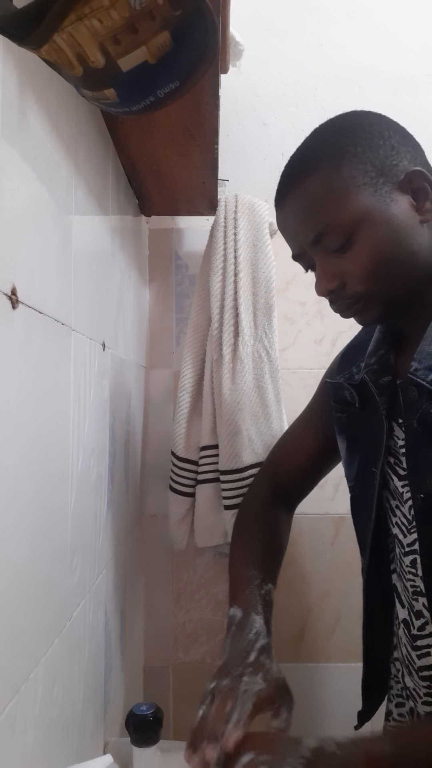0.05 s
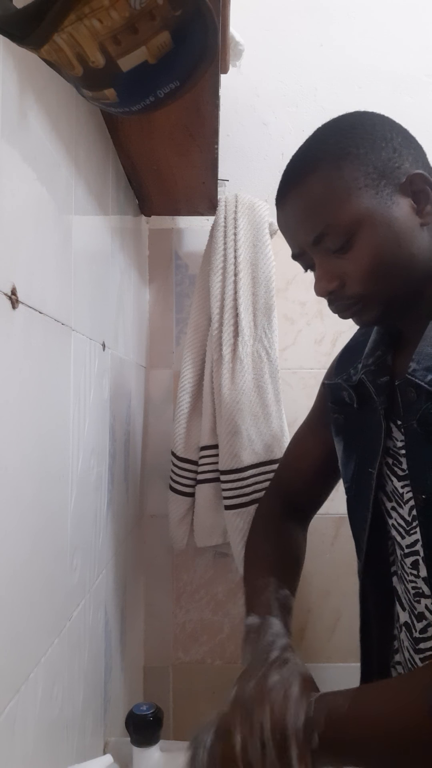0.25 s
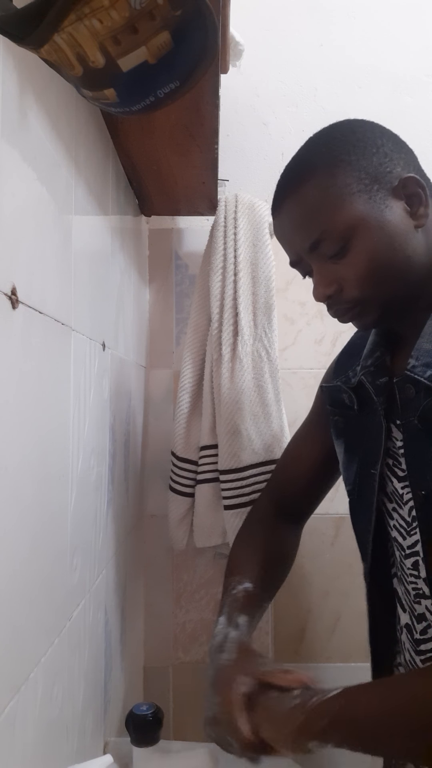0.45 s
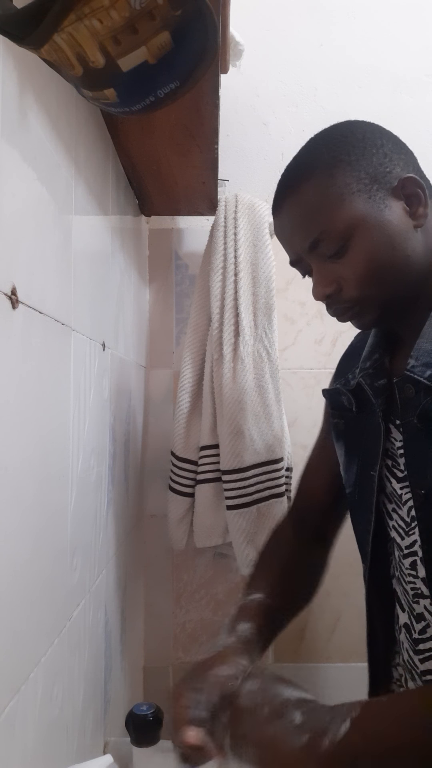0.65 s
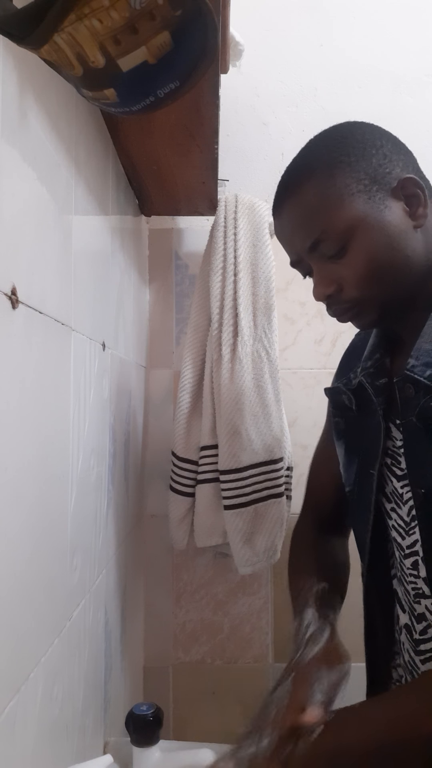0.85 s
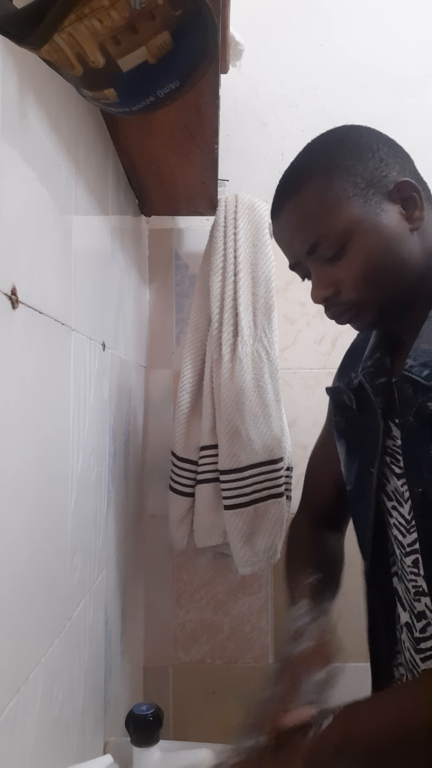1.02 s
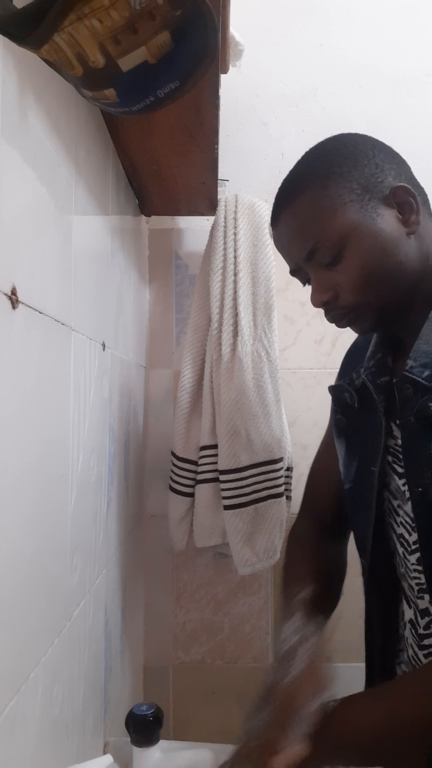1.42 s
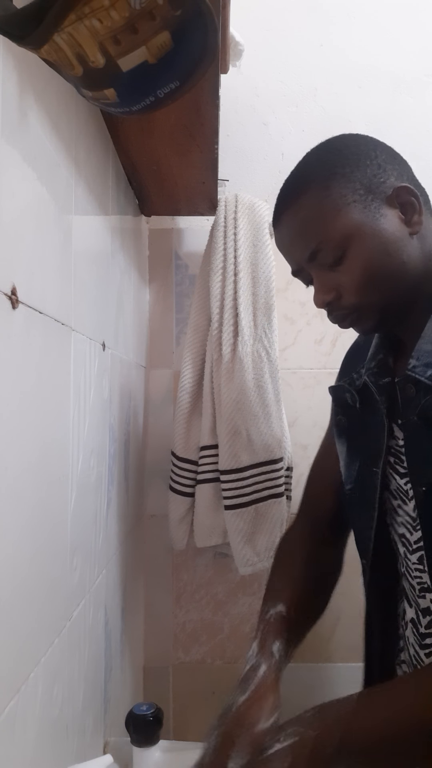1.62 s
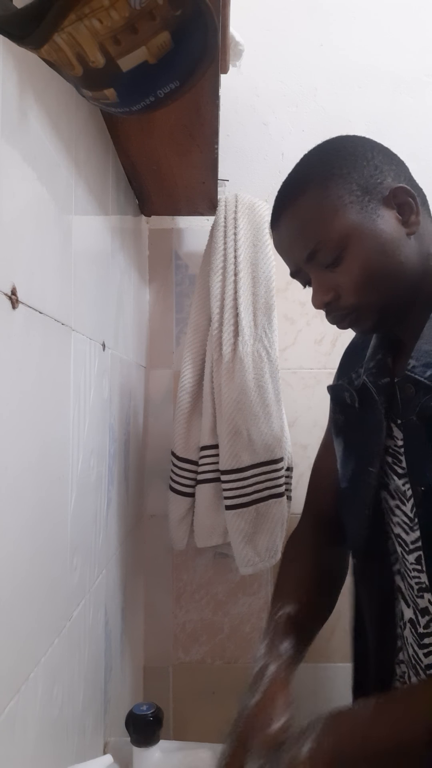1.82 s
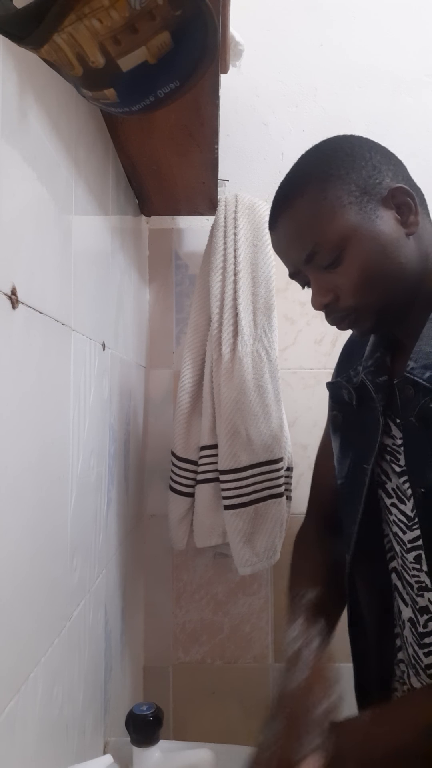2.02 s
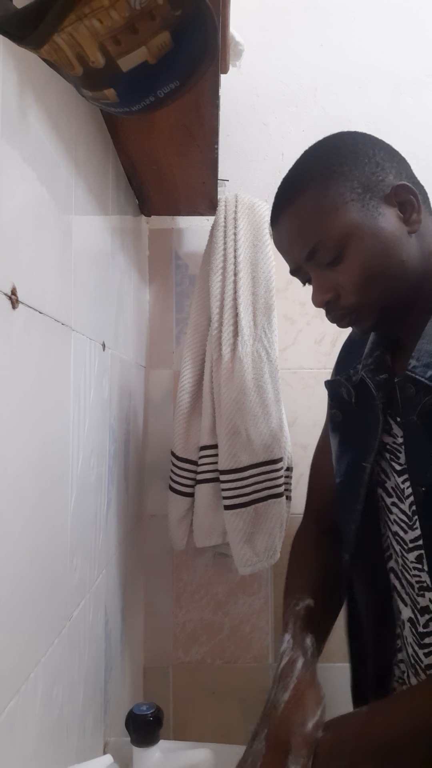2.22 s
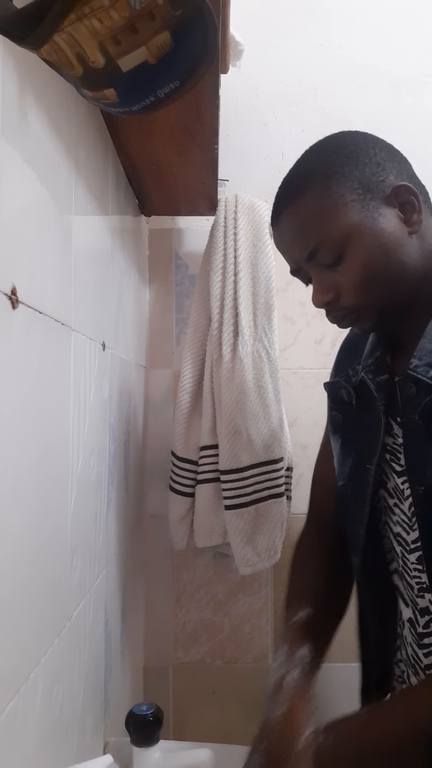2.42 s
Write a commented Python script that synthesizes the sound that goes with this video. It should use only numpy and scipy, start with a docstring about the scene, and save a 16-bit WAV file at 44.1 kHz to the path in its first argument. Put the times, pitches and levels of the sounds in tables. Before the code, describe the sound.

Soapy wet hands rub together in a small tiled bathroom. A sharp, wet squelch comes at about 0.2 seconds, followed by a few softer ones. From 0.7 seconds the hands rub quickly, about eight strokes a second, the lather fizzing and sloshing. Brighter squelches stand out around 2.2 and 2.4 seconds. The tiles add a short ring, and a faint low room rumble lies underneath.

```python
"""A small tiled bathroom: soapy wet hands rub together, about eight strokes a second.
Each stroke shears the lather into a fizz of tiny bursting bubbles; wetter strokes also slosh.
Air trapped between the palms squelches out. The tiles ring with it all,
and the room's lowest resonances boom faintly underneath."""
import sys
import numpy as np
from scipy import signal
from scipy.fft import rfft, irfft, next_fast_len
from scipy.io import wavfile
from scipy.ndimage import map_coordinates

SR = 44100
rng = np.random.default_rng(int(sys.argv[2]) if len(sys.argv) > 2 else 0)


def waveform_to_disk(signal):
    """Save audio, clipped to [-1, 1], as 16-bit WAV at the path in sys.argv[1]."""
    frames = np.transpose(np.atleast_2d(signal))
    scaled = np.clip(frames, -1, 1) * 32767
    samples = np.round(scaled).astype(np.int16)
    wavfile.write(sys.argv[1], SR, samples)


N = 112454


def amp(db):
    """dB to gain."""
    return 10 ** (np.asarray(db) / 20)


def unit(x):
    """Scale to rms 1."""
    return x / np.sqrt(np.mean(x ** 2) + 1e-20)


def along(points, hz):
    """Interpolate (Hz, value) points on a log frequency axis."""
    points_hz, values = np.transpose(points)
    return np.interp(np.log(hz + 1), np.log(points_hz + 1), values)


def curve(rows):
    """Interpolate (s, value) rows to one value per sample."""
    return np.interp(np.arange(N) / SR, *np.transpose(rows))


def wobble(knots_per_s):
    """Smooth random curve."""
    return map_coordinates(rng.standard_normal(2048), [np.arange(N) * knots_per_s / SR], mode="wrap")


def filtered(x, response):
    """Filter x by response(hz)."""
    size = next_fast_len(N + 8192)
    return irfft(rfft(x, size) * response(np.fft.rfftfreq(size, 1 / SR)), size)[..., :N]


def coloured(x, spectrum):
    """Shape x by (Hz, dB) points; rms 1."""
    return unit(filtered(x, lambda hz: amp(along(spectrum, hz))))


def pan(right_db):
    """Stereo gains: left down, right up by right_db."""
    return amp(np.array([[-right_db], [right_db]]))


def bubbles(per_s, size=N, spread_db=2.5, skin_db=-9.5):
    """Tiny bursts of uneven size over the smooth hiss of sliding skin."""
    strengths = amp(spread_db * np.minimum(rng.exponential(size=size), 4)) * rng.choice([-1, 1], size)
    bursts = unit(strengths * (rng.random(size) < per_s / SR))
    return unit(bursts + amp(skin_db) * rng.standard_normal(size))


def rubbing(clump_db=1.76):
    """Each stroke speeds up and slows down; lather fizzes and sparkles, wetter strokes also slosh."""
    # Each row: start, rise and fall in seconds, fizz in dB, slosh in dB, sparkle in dB re fizz.
    strokes = [(-.035, 0.033, 0.026, -70, -69, -22), (0.688, 0.085, 0.081, -56.5, -62.5, -12.5),
               (.785, 0.046, .045, -61, -95, -6), (.905, 0.042, 0.032, -52.5, -67, -9),
               (1.006, 0.036, 0.042, -54.5, -58, -9), (1.114, 0.045, 0.04, -56, -60.5, -9),
               (1.219, 0.03, 0.042, -57.5, -54, -10.5), (1.321, 0.046, 0.034, -61, -62, -5.5),
               (1.437, 0.029, 0.03, -55.5, -58, -8), (1.549, 0.023, 0.052, -57, -67.5, -6.5),
               (1.584, 0.046, 0.077, -64, -67, -7), (1.669, 0.036, .05, -58.5, -82, -8.5),
               (1.793, 0.043, 0.062, -60, -90, -8), (1.905, 0.054, 0.061, -60, -84, -6),
               (2.043, 0.038, 0.087, -57, -87, -7), (2.213, 0.019, .045, -59, -57, -20),
               (2.28, 0.028, .035, -66, -77, -3), (2.425, 0.027, 0.033, -56.5, -63, -4)]
    # Spectra of lather, finest foam and water. Each row: frequency in Hz, relative level in dB.
    fizz_spectrum = [(200, -30), (900, -29), (2200, -20), (3500, -2.5), (5000, 0.5), (7000, 0.5),
                     (9000, -5.5), (12000, -44.5)]
    sparkle_spectrum = [(5000, -14), (8000, -11), (10000, 5), (12000, -2), (15500, -3.5)]
    slosh_spectrum = [(200, -37), (500, -7.5), (1100, -7), (1600, 10), (2400, 13), (3500, 10.5), (7000, -9)]
    t = np.arange(N) / SR
    fizz_gain, slosh_gain, sparkle_gain = np.zeros((3, N))
    for start_s, rise_s, fall_s, fizz_db, slosh_db, sparkle_db in strokes:
        ramp = np.interp(t - start_s, [0, rise_s, rise_s + fall_s], [0, 1, 0])
        speed = np.sin(np.pi / 2 * ramp) ** 2
        fizz_gain += amp(fizz_db) * speed
        slosh_gain += amp(slosh_db) * speed
        sparkle_gain += amp(fizz_db + sparkle_db) * speed
    foam, water = bubbles(per_s=6000), bubbles(per_s=700)
    clumps = unit(amp(clump_db * wobble(knots_per_s=110)))
    fizz = fizz_gain * coloured(foam, fizz_spectrum)
    sparkle = sparkle_gain * coloured(foam, sparkle_spectrum)
    slosh = slosh_gain * coloured(water, slosh_spectrum)
    return clumps * (fizz + sparkle + slosh)


def tile_tail(delay_s=0.00066, build_s=0.0036):
    """Random stereo impulse response of the tiles, energy about 1 a side; treble dies first."""
    # Each row: frequency in Hz, time to decay 60 dB in seconds.
    reverb_times = [(150, 1), (500, 0.46), (1500, 0.43), (4000, 0.41), (7000, 0.38), (14000, 0.33)]
    hz, t = np.fft.rfftfreq(256, 1 / SR), np.arange(0, .55, 128 / SR)
    size = (2, len(hz), len(t))
    noise = rng.standard_normal(size) + 1j * rng.standard_normal(size)
    decay = amp(-60 * t / along(reverb_times, hz)[:, None])
    tail = signal.istft(noise * decay, SR)[1]
    tail *= np.clip((np.arange(tail.shape[1]) / SR - delay_s) / build_s, 0, 1)
    return tail / np.linalg.norm(tail[0])


def bathroom(sounds, reverb_db=1, right_lead_s=.000227, wall_delay_s=.00212, wall_db=-15.5):
    """Each sound gets its own random tile reverb, keeping the ring smooth rather than metallic."""
    direct, reverb = np.zeros(N + SR), np.zeros((2, N + SR))
    for start_s, sound in sounds:
        start = round(start_s * SR)
        ring = signal.fftconvolve(sound[None], tile_tail(), axes=1)
        direct[start:][:len(sound)] += sound
        reverb[:, start:][:, :ring.shape[1]] += ring
    lead_s = right_lead_s * np.array([[-.5], [.5]])  # direct sound reaches the right first
    direct = filtered(direct[:N], lambda hz: np.exp(2j * np.pi * hz * lead_s))
    heard = pan(right_db=4) * direct + amp(reverb_db) * pan(right_db=1.96) * reverb[:, :N]
    # One echo off the surface beside the microphone.
    return filtered(heard, lambda hz: 1 + amp(wall_db) * np.exp(-2j * np.pi * hz * wall_delay_s))


def room_tone(boom_hz=143.2, wander_hz=2.98, boom_db=1, rumble_db=0.5, side_db=-9.5, hiss_db=-75):
    """A low room resonance swells and fades over a dull rumble and a faint hiss."""
    # Each row: time in seconds, relative level in dB.
    boom_levels = [(0.0, -66), (0.03, -72), (0.49, -66.5), (0.68, -72), (0.79, -58), (0.86, -51.5),
                   (1.01, -69), (1.1, -63.5), (1.21, -79.5), (1.33, -76), (1.87, -74.5), (1.96, -61),
                   (2.18, -60), (2.34, -84.5), (2.52, -70), (2.55, -82)]
    rumble_levels = [(0.0, -71.5), (0.24, -62.5), (0.56, -67), (0.89, -59.5), (1.07, -71), (1.12, -65.5),
                     (1.22, -76.5), (2.26, -68), (2.31, -77), (2.55, -70.5)]
    # Each row: frequency in Hz, relative level in dB.
    rumble_spectrum = [(20, -48), (45, -20.5), (62, -1.5), (100, 1), (130, 4.5), (165, 2), (200, 4.5),
                       (240, -4.5), (320, -4), (500, -17.5), (1000, -35.5)]
    hiss_spectrum = [(30, 5), (70, 13.5), (150, 5), (500, -12), (1500, -8.5), (5000, -8.5), (15000, -16.5)]
    phase = 2 * np.pi * np.cumsum(boom_hz + wander_hz * wobble(knots_per_s=13)) / SR
    boom = amp(curve(boom_levels) + boom_db) * unit(np.sin(phase))
    mid, side = coloured(rng.standard_normal((2, N)), rumble_spectrum)
    rumble = amp(curve(rumble_levels) + rumble_db) * (mid + amp(side_db) * np.array([side, -side]))
    hiss = amp(hiss_db) * coloured(rng.standard_normal((2, N)), hiss_spectrum)
    return pan(right_db=2.26) * (boom + rumble + hiss)


def spurt(envelope, gain):
    """Short rush of bursting bubbles, whitened, then shaped by gain(hz); energy 1."""
    size = len(envelope)
    spectrum = rfft(bubbles(per_s=8000, size=size) * envelope, 2 * size)
    white = spectrum / (np.abs(spectrum) + 1e-9)
    rush = irfft(white * gain(np.fft.rfftfreq(2 * size, 1 / SR)), 2 * size)[:size]
    return rush / np.linalg.norm(rush)


def squelches(rise_s=0.00048):
    """Air spurts from a pocket between the palms, rings it and sprays foam; (start_s, sound) pairs."""
    # Each row: start in seconds, level in dB, pitch in Hz, width in octaves, decay in seconds,
    # spray in dB re pocket.
    air_pockets = [(.1585, -60, 8000, 0.68, 0.017, -8.5), (.227, -46, 2030, 1.8, 0.0081, -2),
                   (0.2356, -31, 3740, .3, 0.0066, 2), (.2375, -24.5, 6120, 0.34, 0.0042, -9.5),
                   (0.2431, -29.5, 4640, 1.3, 0.0027, 3.5), (.241, -43, 1480, 0.089, 0.0088, -35),
                   (.241, -55, 507, .6, 0.011, -27), (.425, -68.5, 900, 0.35, 0.044, 9),
                   (0.429, -54.5, 4500, 0.65, 0.0087, -14), (0.515, -53.5, 1255, 0.39, 0.0063, -16.5),
                   (.5761, -46, 3620, 0.53, 0.0016, -3), (0.6762, -50.5, 5300, 0.59, 0.001, 4),
                   (0.713, -65.5, 1190, 0.98, 0.033, -3), (.936, -71.5, 1010, 0.76, 0.029, -31.5),
                   (0.959, -47, 2320, 0.76, 0.004, -4), (1.172, -60, 1110, 1.2, 0.0053, -31),
                   (1.24, -44.5, 1820, 0.23, 0.0083, -4), (1.241, -60, 1170, 0.42, 0.011, 4),
                   (1.254, -42, 7200, 0.74, 0.0049, -10), (1.352, -39.5, 4800, 0.71, 0.0027, -2.5),
                   (1.38, -55.5, 920, 0.66, 0.0077, -14), (1.386, -51.5, 1840, 0.6, 0.014, -28),
                   (1.56, -72, 510, 0.33, 0.015, -12), (1.605, -45.5, 5460, 0.88, 0.0061, 0.5),
                   (1.61, -68.5, 568, 0.38, 0.031, -5), (1.9535, -47, 4980, 0.15, 0.0023, -3.5),
                   (2.199, -34, 4460, 0.35, 0.0025, -1), (2.2232, -31.5, 4900, 0.99, 0.0032, -7.5),
                   (2.2236, -39.5, 2050, 0.86, 0.0059, -16), (2.3002, -45, 4070, .4, 0.0027, -13.5),
                   (2.301, -60, 584, 0.42, 0.0036, -14), (2.4399, -32, 5620, 0.26, 0.0012, -3),
                   (2.441, -59, 524, .45, .008, -13), (2.454, -46.5, 3870, 0.38, 0.006, 3)]
    # Each row: frequency in Hz, relative level in dB.
    spray_spectrum = [(150, -17), (500, -5), (1000, -9), (1600, 2), (4000, 4.5), (7000, 9), (11000, -1.5),
                      (15500, -13.5)]
    sounds, t = [], np.arange(SR // 6) / SR
    for start_s, level_db, pocket_hz, width_oct, decay_s, spray_db in air_pockets:
        envelope = (1 - np.exp(-t / rise_s)) * np.exp(-t / decay_s)
        pocket = spurt(envelope, lambda hz: 1 / (1 + (np.log2((hz + 1) / pocket_hz) / width_oct) ** 4))
        spray = spurt(envelope, lambda hz: amp(along(spray_spectrum, hz)))
        gain = amp(level_db) * np.linalg.norm(envelope)
        sounds.append((start_s, gain * (pocket + amp(spray_db) * spray)))
    return sounds


def scene(stretch_count=8):
    """Hands in the room; each stretch of rubbing gets its own random tile reverb."""
    rub = rubbing()
    stretches = [(part[0] / SR, rub[part]) for part in np.array_split(np.arange(N), stretch_count)]
    return bathroom(stretches + squelches()) + room_tone()


def record(dry, top_hz=15900):
    """Microphone: treble notch, lift above it, hard band limit."""
    # Each row: frequency in Hz, gain in dB.
    mic_response = [(7000, 0), (7800, -4.5), (8250, -22), (9000, -15.5), (10000, -7.5), (11000, 2.5),
                    (16000, 7)]
    return filtered(dry, lambda hz: amp(along(mic_response, hz)) * (hz < top_hz))


dry = scene()
out = record(dry)
waveform_to_disk(out)
```